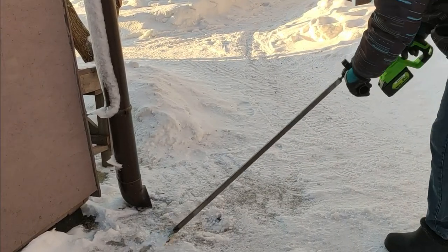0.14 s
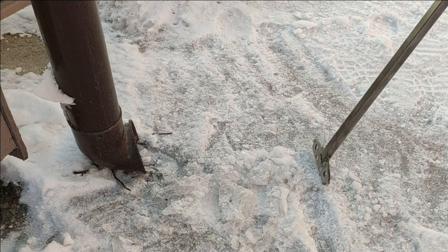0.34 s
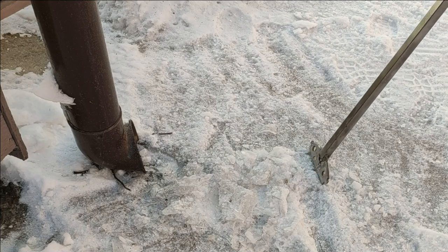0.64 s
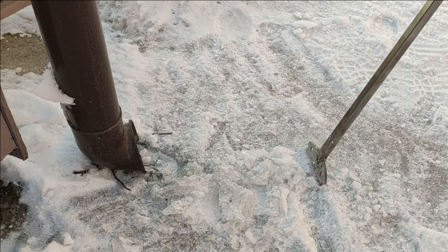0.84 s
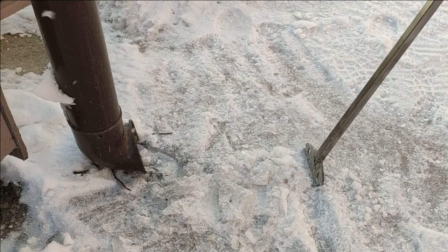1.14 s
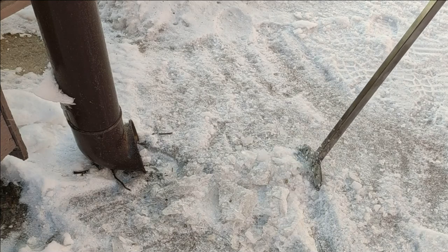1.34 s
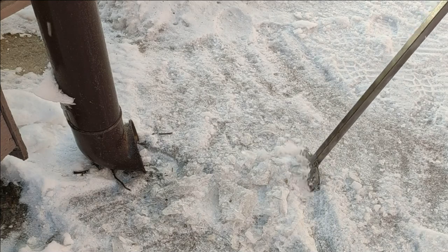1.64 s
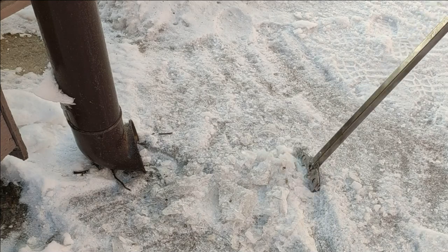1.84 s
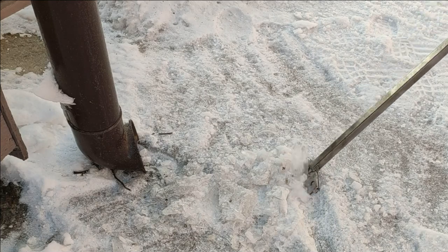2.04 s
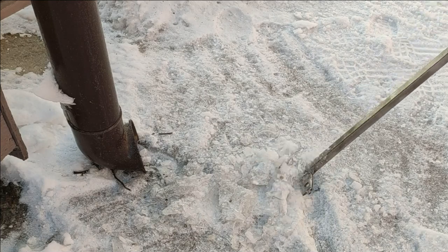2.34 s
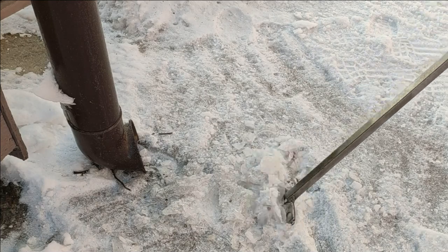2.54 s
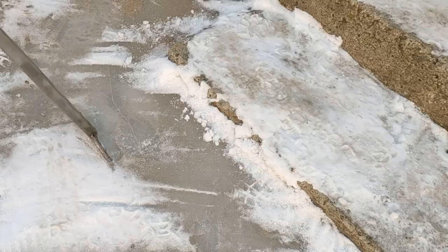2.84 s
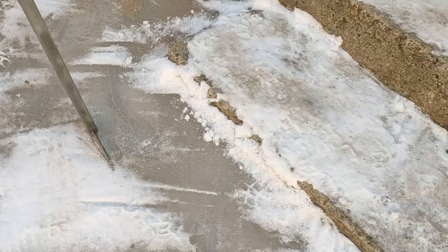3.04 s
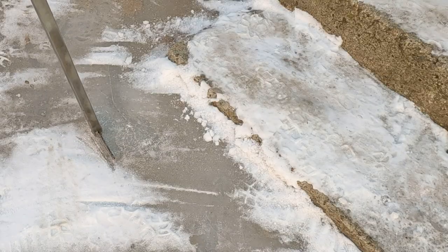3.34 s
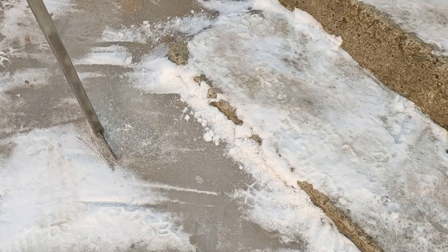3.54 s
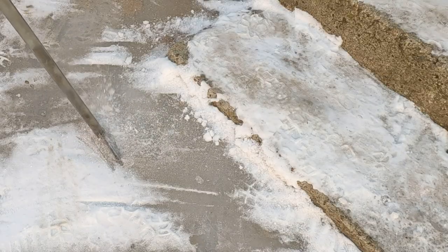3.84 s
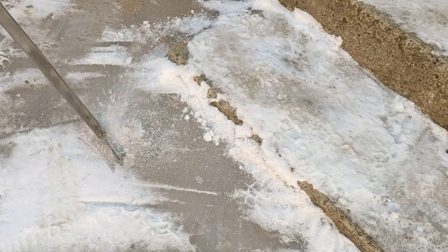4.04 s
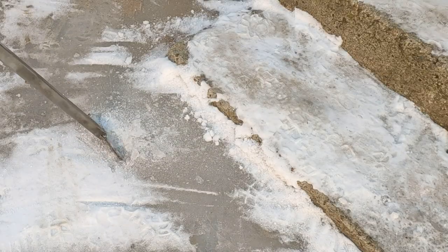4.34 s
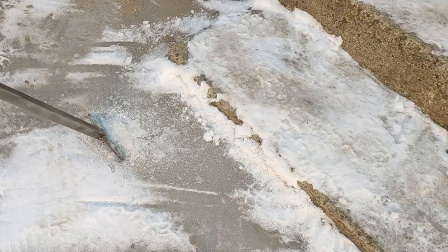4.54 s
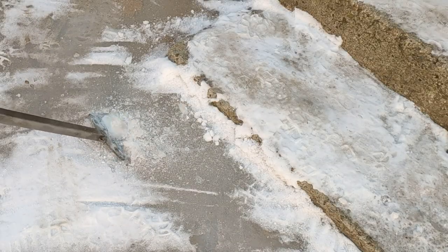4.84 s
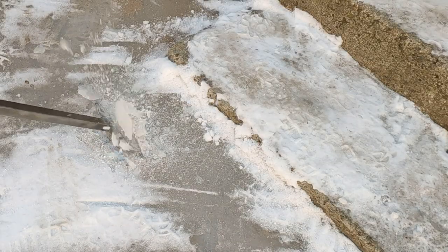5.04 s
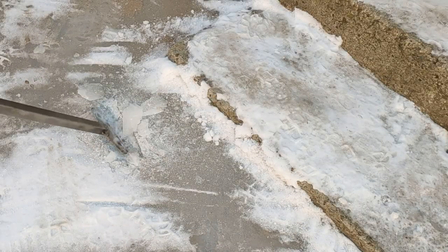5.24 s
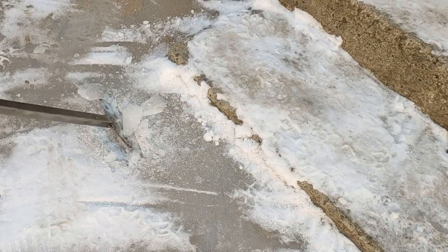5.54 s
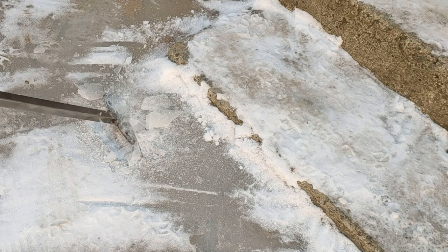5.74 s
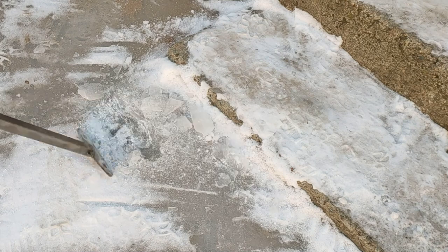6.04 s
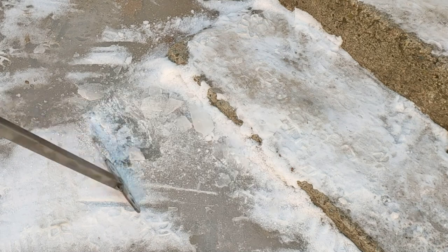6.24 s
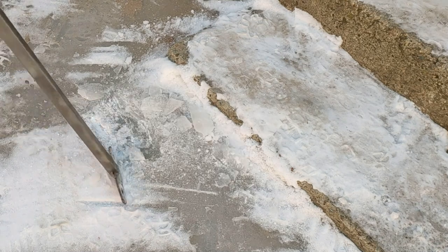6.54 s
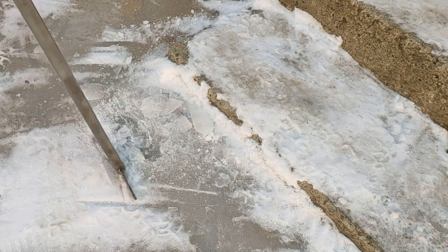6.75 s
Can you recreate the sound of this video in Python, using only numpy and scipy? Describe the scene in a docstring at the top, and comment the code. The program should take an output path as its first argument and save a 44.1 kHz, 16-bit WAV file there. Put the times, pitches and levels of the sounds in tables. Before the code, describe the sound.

Bright gritty ice scraping from a motorized steel rod, buzzing steadily with ringing and thin whine, cut by a tiny gap, then blade clicks and another push.

```python
"""A gust bumps the two-port microphone as a battery tool shoves a steel rod and blade through a coarse ice crust.
From a quarter second on, about 181 blows a second crush puffs of ice grains and ring the rod, amid squeals.
The motor hums and bogs down near 1.1 and 2.2 s; a thin whine comes in spells; chunks crack loose from 2 s onward.
Everything drops out briefly near 2.8 s, then a second long push grinds on until 6.2 s.
The blade ticks on the paving as it lifts and lands, and a last short push ends the scene over outdoor rumble."""
import sys
import numpy as np
from scipy import signal
from scipy.fft import rfft, irfft
from scipy.io import wavfile
from scipy.ndimage import uniform_filter1d, map_coordinates

SR = 44100
rng = np.random.default_rng(int(sys.argv[2]) if len(sys.argv) > 2 else 0)


def dump_mix(stems):
    """Bounce the given channels to the path in sys.argv[1] as a 16-bit WAV at rate SR."""
    frames = np.atleast_2d(stems).T  # one column per channel
    limited = np.clip(frames, -1, 1)  # hard clip at full scale
    pcm = np.round(limited * 32767).astype(np.int16)
    wavfile.write(sys.argv[1], SR, pcm)


N = 304290
TIME = np.arange(N) / SR  # seconds
FREQ = np.maximum(np.arange(N // 2 + 1) * SR / N, 1)  # Hz
FULL_HZ = 181.1  # blows per second at full speed
TOP_HZ = 15850  # upper edge of the sound


# how hard the blade cuts, reference level of the fine ice: [start_s, level_db]
CUT = [(0.32, -39.5), (0.48, -41.5), (0.7, -40.5), (1.0, -41.5), (1.12, -44), (1.22, -42), (1.45, -40.5),
       (1.75, -40), (1.97, -41.5), (2.11, -40), (2.28, -42.5), (2.52, -42.5), (2.68, -41), (2.93, -40),
       (3.25, -40), (3.69, -40), (3.9, -40.5), (4.1, -40), (4.35, -40.5), (4.52, -40), (4.65, -40.8),
       (4.93, -39.3), (5.17, -41.5), (5.5, -41.2), (5.7, -40.5), (5.92, -40.2), (6.05, -40.5), (6.15, -41),
       (6.48, -40.2), (6.6, -39.5), (6.7, -41), (6.86, -40.5)]
# level of the low crunch over time, before its trim: [start_s, level_db]
CRUNCH_LEVEL = [(0.28, -69.5), (0.36, -72), (0.84, -65.5), (1.1, -75), (1.35, -69), (1.68, -66.5),
                (1.92, -70.5), (2.03, -65.5), (2.4, -67), (2.65, -72.5), (2.76, -67.5), (2.93, -72.5),
                (3.12, -72), (3.23, -67.5), (3.33, -70), (3.45, -66), (3.56, -71), (3.69, -69), (3.9, -74),
                (4.1, -65), (4.22, -61.5), (4.34, -61.5), (4.45, -63), (4.62, -71), (4.8, -67), (5.05, -74),
                (5.15, -82), (5.36, -73), (5.48, -79), (5.68, -69), (5.79, -83.5), (5.87, -67),
                (6.05, -67.5), (6.15, -73), (6.48, -70), (6.86, -76)]
# finest sizzling powder, relative to the cut and before its trim: [start_s, level_db]
POWDER = [(.3, -1.5), (.8, -2.5), (1.12, -0.5), (1.37, -6), (1.43, 0), (1.53, -3), (1.8, -5), (2.0, -3),
          (2.09, 1), (2.19, -1), (2.4, -.5), (2.95, 0), (3.25, 1.5), (3.55, -4), (3.68, 2), (3.83, -3),
          (4.0, -2.5), (4.12, 1), (4.3, 2.5), (4.47, 3), (4.6, -0.5), (4.85, -.5), (5.0, 1), (5.2, -1.5),
          (5.55, -.5), (5.95, 1.5), (6.15, 1), (6.6, -1), (6.86, 0)]
# rasp of the larger grains, relative to the cut: [start_s, level_db]
CHIPS = [(.3, -12), (.9, -13.5), (1.4, -14), (1.68, -12), (2.1, -12), (2.65, -10.5), (2.95, -13),
         (3.9, -12), (4.37, -7.5), (4.7, -10.5), (5.3, -11.5), (5.6, -12), (6.15, -10), (6.8, -9.5)]
# spectra of the four grain sizes, relative levels: [pitch_hz, level_db]
SPRAY_SPECTRUM = [(300, -23), (550, -18.5), (900, -14.5), (1500, -10.5), (2500, -6.5), (3700, -1.5),
                  (4500, 1), (5400, 0.5), (7000, 0.5), (8200, 1), (10500, 0), (13000, -0.5), (16000, -12.5)]
SIZZLE_SPECTRUM = [(6000, -26), (10000, 1.5), (12000, 7.5), (14000, 11), (15500, 12), (17000, -25)]
RASP_SPECTRUM = [(500, -17.5), (1400, -9), (2300, -2), (3100, 3), (3900, -7.5), (6000, -16)]
CRUNCH_SPECTRUM = [(50, 1), (130, 0), (300, 0), (600, 0.5), (1100, -3.5), (2000, -6.5), (5000, -37)]
SPRAY_TRIM_DB, SIZZLE_TRIM_DB, CRUNCH_TRIM_DB = 1.41, -2, 5.5
CRUST_DB, CRUST_END_S = -44.5, 0.2  # the opening shove goes through a coarse crust


def ice(flow):
    """Crushed ice: fractures of every size, from coarse crumbs and gritty chips to sizzling powder."""
    cut_db, = curves(CUT)
    crunch_level_db, = curves(CRUNCH_LEVEL)
    powder_db, = curves(POWDER)
    chips_db, = curves(CHIPS)

    fine = treble_swells(grains(flow, scatter_db=0.63), depth_db=1.21, rate=11, count=32)
    spray = colour(ripple(fine), SPRAY_SPECTRUM) * undb(SPRAY_TRIM_DB)

    finest = treble_swells(grains(flow, scatter_db=2.5), depth_db=3.0, rate=14, count=24)
    sizzle = colour(finest, SIZZLE_SPECTRUM) * undb(SIZZLE_TRIM_DB + powder_db)

    # larger chips follow the blows less sharply
    chips = grains(np.sqrt(flow), scatter_db=1.7, count=30)
    rasp = colour(chips, RASP_SPECTRUM) * undb(chips_db)

    coarse = grains(flow, scatter_db=2.0, count=60)
    crust = resonate(coarse, [(880, 3700, 0)]) * undb(CRUST_DB) * (TIME < CRUST_END_S)
    crunch_db = crunch_level_db + CRUNCH_TRIM_DB + 2.3 * walk(12)
    crunch = colour(coarse, CRUNCH_SPECTRUM) * undb(crunch_db)
    return (spray + sizzle + rasp) * undb(cut_db) + crust + crunch


# resonances of the rod, relative levels: [pitch_hz, width_hz, level_db]
ROD_MODES = [(1641, 48, -3), (1718, 57, -1.5), (1797, 61, -1), (1965, 65, -3.5)]
# how freely the rod rings: [start_s, grinding_db, tenth_harmonic_db, eleventh_harmonic_db]
RING = [(.28, -61, -56, -56), (.38, -59, -66, -57), (.55, -62, -69, -66), (.75, -62, -57.5, -60),
        (1.0, -65, -81, -64), (1.1, -73, -73, -68), (1.21, -60, -68, -57), (1.34, -59, -62, -72),
        (1.52, -63, -58, -68), (1.67, -56, -53, -57), (1.9, -62, -57, -65), (2.0, -68, -67, -69),
        (2.5, -77, -75, -66), (2.62, -82, -75, -60), (2.72, -61, -62, -52.5), (2.8, -55.5, -71, -74),
        (2.95, -59.5, -70, -56), (3.12, -60, -64, -63), (3.32, -60, -65, -72), (3.45, -56, -68, -65),
        (3.6, -54, -65, -60), (3.68, -56, -56, -61), (3.95, -58, -67, -67), (4.12, -56.5, -60.5, -67),
        (4.65, -56.5, -59, -64), (4.92, -53.5, -59, -66), (5.12, -57, -55, -58), (5.31, -52.5, -49, -64),
        (5.45, -58, -57.5, -66), (5.65, -56.5, -58, -60), (5.75, -53.5, -60, -65), (5.92, -54.5, -62, -66),
        (6.15, -53.5, -69, -71), (6.48, -57.5, -65, -61), (6.67, -54.5, -53, -58.5),
        (6.86, -57, -67.5, -64)]
# spells in which the rod also sings on the 15th harmonic: [start_s, end_s, level_db]
OVERTONES = [(.72, 1.04, -60), (1.54, 2.2, -55), (5.05, 5.38, -53)]
FLUTTER_DB, FLUTTER_PER_S = 0.5, 18  # uneven ringing as the blade catches and slips


def rod(turns, flow):
    """Grinding rings the rod broadly; harmonics of the blows that meet its resonances sing as clear tones."""
    grind_db, tenth_db, eleventh_db = curves(RING)
    grinding = resonate(grains(flow, scatter_db=-3.5), ROD_MODES) * undb(grind_db)
    singing = sum(tones(turns, [(multiple, 0)], waver_db=0.5, stray=0.3) * undb(db)
                  for multiple, db in [(10, tenth_db), (11, eleventh_db)])
    overtone = tones(turns, [(15, 0)], waver_db=3.0, stray=0.23) * spells(OVERTONES)
    return (grinding + singing + overtone) * undb(FLUTTER_DB * walk(FLUTTER_PER_S))


# the blade catches and the rod flares: [middle_s, length_s, pitch_hz, level_db]
FLARES = [(3.163, 0.074, 1770, -51), (3.376, 0.055, 1820, -52), (3.445, 0.081, 1805, -46.5),
          (3.528, 0.067, 1798, -48.5), (3.587, 0.065, 1805, -48), (3.655, 0.057, 1810, -53.5),
          (3.603, .06, 1720, -50), (3.794, 0.059, 1630, -53), (5.18, 0.055, 1810, -53)]


def flares():
    """The blade catches for a moment and one resonance of the rod flares up."""
    wobble = 0.29 * walk(100)  # radians, shared by all flares
    total = 0
    for middle, length, hz, db in FLARES:
        tone = np.sqrt(2) * np.sin(2 * np.pi * (hz * TIME + rng.random()) + wobble)
        total = total + tone * bump(middle, length) * undb(db)
    return ports(total)


# narrow squeals and broad swells of rasp or hiss; a row that ends before it starts is silent:
# [start_s, end_s, pitch_hz, width_hz, level_db]
SQUEALS = [(-.05, 0.175, 10340, 140, -42), (-.05, .26, 12800, 54, -46), (.35, 1.65, 3440, 330, -56.5),
           (.25, 1.1, 4100, 420, -55.5), (.25, 1.1, 14600, 1500, -53), (1.253, 2.75, 15100, 600, -47),
           (1.25, 2.802, 8840, 220, -52), (1.29, 2.75, 4560, 200, -55), (1.455, 2.01, 3000, 1500, -53.5),
           (1.55, 1.94, 2280, 500, -54), (1.998, 2.2, 1050, 800, -59), (2.03, 2.6, 6400, 200, -54),
           (3.5, 3.28, 11000, 400, -45), (3.455, 3.8, 12300, 870, -45), (3.973, 4.52, 900, 1600, -58),
           (4.07, 4.52, 11850, 220, -48), (5.0, 6.25, 4720, 220, -54.5)]


def squeals(flow):
    """Squeals and broad swells of friction noise, often overlapping, each band-passed from the same grains."""
    friction = grains(flow, scatter_db=1.0)
    return sum(resonate(friction, [(hz, width, 0)]) * swell(start, end) * undb(db)
               for start, end, hz, width, db in SQUEALS)


# lines of the tool's buzz, relative levels: [multiple_of_blow_rate, level_db]
BUZZ_LINES = [(.4, -11.5), (.6, -15), (1, -10), (3.43, -11), (4, -10), (5, -13.5), (8, -7.5), (9, -4.5),
              (12, -2), (13, -17), (14, -4.5), (15, 1), (16, -11), (17, 0.5), (18, -24)]
# levels of the hum at full speed: [start_s, third_harmonic_db, sixth_harmonic_db, seventh_harmonic_db, buzz_db]
HUM = [(.28, -64, -68, -70, -56), (.42, -62, -64, -70, -56), (.56, -64, -68, -68, -58),
       (.72, -59, -69, -66, -55.5), (.83, -59, -73, -78, -59.5), (.99, -58.5, -69, -66, -58.5),
       (1.08, -68.5, -84, -78, -56), (1.3, -65.5, -72, -68, -57.5), (1.6, -67, -62.5, -68, -58.5),
       (1.8, -71, -73, -79, -55.5), (1.95, -65.5, -64.5, -69.5, -62), (2.13, -61, -73, -57, -63),
       (2.19, -63.5, -80, -69, -61), (2.45, -66.5, -79, -71, -56), (2.76, -64.5, -76, -68, -56.5),
       (2.93, -79, -72, -75, -57.5), (3.2, -73, -71, -72, -57), (3.37, -66, -71, -70, -57),
       (3.55, -71, -74, -69, -55), (3.95, -67.5, -71, -64.5, -56), (4.2, -70, -70, -73, -58.5),
       (4.95, -67.5, -68.5, -73, -57), (5.22, -66, -73, -60.5, -54.5), (5.55, -74, -65.5, -73, -55.5),
       (5.72, -64, -70.5, -70, -58), (5.9, -70.5, -70, -69, -56.5), (6.12, -67, -70, -66, -58.5),
       (6.48, -73, -72, -70, -60), (6.86, -71.5, -66, -74, -61)]
BUZZ_POWER = 5.5  # how steeply the buzz amplitude falls with motor speed
ROUGH_DB, ROUGH_PER_S = 1.5, 120  # no two blows are equally hard


def motor(turns, speed):
    """Buzz of the mechanism and drone of the housing, as lines locked to the blows."""
    third_db, sixth_db, seventh_db, buzz_db = curves(HUM)
    # the mechanism hammers much more softly when the motor bogs down
    buzz = tones(turns, BUZZ_LINES, waver_db=1.8, stray=0.24) * undb(buzz_db) * speed ** BUZZ_POWER
    drone = sum(tones(turns, [(multiple, 0)], waver_db=1.3, stray=0.19) * undb(db)
                for multiple, db in [(3, third_db), (6, sixth_db), (7, seventh_db)])
    return (buzz + drone) * undb(ROUGH_DB * walk(ROUGH_PER_S))


# spells of a thin steady whine: [start_s, end_s, level_db]
WHINES = [(.2, 1.04, -51.5), (1.22, 2.2, -54.5), (3.95, 4.853, -50)]
WHINE_HZ, WHINE_WIDTH_HZ = 9936, 24


def whine():
    """A thin steady whine near 9.9 kHz that comes in spells, made of noise through one narrow resonance."""
    return resonate(hiss(), [(WHINE_HZ, WHINE_WIDTH_HZ, 0)]) * spells(WHINES)


# the motor bogs down under load: [start_s, blow_rate_lost_hz]
SAG = [(.99, 0), (1.06, 20.5), (1.13, 25), (1.2, 8), (1.26, 0), (2.14, 0), (2.21, 19), (2.27, 24),
       (2.48, 23), (2.6, 15), (2.7, 11), (2.78, 3), (2.84, 0), (6.25, 0), (6.38, 10), (6.46, 3), (6.53, 0),
       (6.83, 0.5), (6.9, 12.5)]


def blow_rate():
    """Load on the motor pulls the blow rate below full speed; gives blows per second."""
    lost_hz, = curves(SAG)
    return FULL_HZ - lost_hz


PUFF_SIZE = 0.62  # extra flow at each blow, relative to the steady grinding
PUFF_RISE_CYCLES, PUFF_FALL_CYCLES = 0.035, 0.075


def grain_flow(turns):
    """Each blow throws a short puff of grains on top of the steady grinding."""
    falling = np.exp(-(turns % 1) / PUFF_FALL_CYCLES)
    rising = np.exp(-(-turns % 1) / PUFF_RISE_CYCLES)
    return (1 + PUFF_SIZE * np.maximum(falling, rising)) * undb(0.36 * walk(70))


# pushes of the blade into the ice: [start_s, end_s, attack_s, first_touch_db, held_db]
PUSHES = [(-.02, 0.057, .01, 0, 3.5), (.15, 0.26, 0.12, -29.5, -27), (.244, 2.829, 0.0064, -11, 0),
          (2.815, 6.168, 0.11, -7.5, 0), (6.344, 6.907, 0.1, -19.5, 0)]
RELEASE_DB_PER_S = 354


def pushes():
    """Each push swells from a touch, holds and dies away steadily; gives the pressure on the ice."""
    press = 0
    for start, end, attack, touch_db, held_db in PUSHES:
        attack_db = np.interp(TIME - start, [0, attack], [touch_db, held_db])
        release_db = RELEASE_DB_PER_S * np.maximum(TIME - end, 0)
        press = np.maximum(press, undb(attack_db - release_db) * (TIME >= start))
    return press


# the bare blade touches the paving as it lifts and lands, before the fade: [start_s, level_db]
TICKS = [(0.213, -52), (6.214, -37.5), (6.33, -56.5), (6.344, -42.5)]
TICK_DECAY_S = 0.0037


def ticks():
    """Short bright clicks of steel on stone."""
    click = colour(hiss(), [(500, -8), (2000, -8), (6000, 5), (15000, 3.0)])
    return click * hits(TICKS, TICK_DECAY_S)


# chunks breaking off, before the fade: [start_s, level_db]
KNOCKS = [(2.049, -56), (3.143, -36), (3.218, -39), (3.645, -47), (4.029, -43), (4.11, -46), (4.315, -41.5),
          (4.372, -43), (4.464, -42.5), (5.3, -42)]
# dull bumps through the ground, before the fade: [start_s, level_db]
BUMPS = [(1.82, -57), (2.02, -64), (2.18, -56), (3.49, -66), (3.68, -61), (4.11, -59.5)]
KNOCK_DECAY_S, BUMP_DECAY_S = 0.013, 0.04


def knocks():
    """Chunks of ice crack off in grainy bursts, and heavier shoves thud through the ground."""
    crack = colour(grains(1, scatter_db=3.5), [(120, 0.0), (500, -4), (1800, -0.5), (4000, -0.5), (12000, -11.0)])
    thud = colour(hiss(), [(30, 1), (55, -9), (130, -15), (400, -24), (2000, -63)])
    return crack * hits(KNOCKS, KNOCK_DECAY_S) + thud * hits(BUMPS, BUMP_DECAY_S)


# spectrum of the outdoor rumble, relative levels: [pitch_hz, level_db]
YARD_SPECTRUM = [(15, 3.5), (40, -9.5), (72, 4), (120, -5), (200, -9.5), (400, -30.5), (1500, -31.5),
                 (16000, -48)]
# gust and thump levels come before the port gains and the bass cut
GUST_DB, GUST_HOLD_S, GUST_FALL_DB_PER_S = -40, 0.02, 283
THUMP_DB, THUMP_PEAK_S, THUMP_LENGTH_S, BASS_CUT_HZ = -27, 0.034, 0.14, 1.85


def air():
    """Steady outdoor rumble, and one gust whose turbulence and pressure mostly buffet the right port."""
    yard = colour(hiss(), YARD_SPECTRUM) * undb(-68.0)
    buffet = colour(rng.standard_normal((2, N)),
                    [(20, -3), (35, -6.0), (70, -13), (130, -9.0), (400, -24), (2000, -64)])
    gust = undb(GUST_DB - GUST_FALL_DB_PER_S * np.maximum(TIME - GUST_HOLD_S, 0))
    # the puff's pressure swings slowly back through the microphone's bass cut
    puff = bump(THUMP_PEAK_S, THUMP_LENGTH_S) * undb(THUMP_DB)
    swing = irfft(rfft(puff) * (FREQ / (FREQ - 1j * BASS_CUT_HZ)) ** 2, N)
    port_gains = undb(np.array([[-13], [1.5]]))  # left, right
    return yard + (buffet * gust + swing) * port_gains


DROPOUT_S, DROPOUT_DB_PER_S = 2.786, 2000.5
RETURN_START_S, RETURN_S = 2.826, 0.0095


def dropout():
    """The whole sound fades out fast and comes straight back."""
    fall = undb(-DROPOUT_DB_PER_S * np.maximum(TIME - DROPOUT_S, 0))
    comeback = np.clip((TIME - RETURN_START_S) / RETURN_S, 0.001, 1)
    return np.maximum(fall, comeback)


# share of the sound that arrives directly: [pitch_hz, power_share_0_to_1]
DIRECT_SHARE = [(100, 0.6), (300, 0.03), (600, 0.26), (1200, 0.49), (1900, 0.25), (3000, 0.52), (6000, 0.3),
                (15000, 0.14)]


def grains(flow, scatter_db, count=10):
    """Dense tiny fractures of uneven size, heard directly and scattered off the ground and walls."""
    # each random size lasts for count samples
    sizes = np.minimum(rng.exponential(size=N // count + 1), 6)
    strength = flow * undb(scatter_db * np.repeat(sizes, count)[:N])
    direct = ports(strength * rng.standard_normal(N))
    scattered = strength * rng.standard_normal((2, N))
    share = np.clip(across(DIRECT_SHARE), 0, 1)
    return irfft(rfft(direct) * np.sqrt(share) + rfft(scattered) * np.sqrt(1 - share), N)


def hiss():
    """Smooth noise from the direction of the tool."""
    return grains(1, 0)


def tones(turns, orders, waver_db, stray):
    """Lines locked to the blows; each wavers as the grip and the reflections change."""
    direct, reflected = 0, 0
    for multiple, db in orders:
        phase = 2 * np.pi * (multiple * turns + rng.random())
        line = undb(db + waver_db * walk(14)) * np.exp(1j * phase)
        direct = direct + line.real
        reflected = reflected + (line * (walk(17.0) + 1j * walk(5.6))).imag
    # reflections reach the two ports in opposite polarity
    return unit(ports(direct) + stray * reflected * np.array([[1], [-1]]))


def treble_swells(x, depth_db, rate, count):
    """Regions of the spectrum, most of them treble, swell and sink at random, each on its own."""
    spectrum = rfft(x)
    centres = np.linspace(0, TOP_HZ, count)
    total = 0
    for row in np.eye(count):
        band = np.interp(FREQ, centres, row)
        total = total + irfft(spectrum * band, N) * undb(depth_db * walk(rate))
    return unit(total)


RIPPLE_DB, RIPPLE_WIDTH_HZ = 1.0, 55


def ripple(x):
    """Small random peaks and dips, fixed in time, roughen the spectrum."""
    gains_db = RIPPLE_DB * rng.standard_normal(size=1000)
    ripple_db = np.interp(FREQ / RIPPLE_WIDTH_HZ, np.arange(len(gains_db)), gains_db)
    return irfft(rfft(x) * undb(ripple_db), N)


# lag of the left microphone port behind the right: [start_s, lag_samples]
PORT_LAG = [(0, 4.64), (2.8, 4.76), (2.83, 5.7), (6.9, 6.3)]


def ports(x):
    """The direct sound reaches the right port first."""
    lag, = curves(PORT_LAG)
    left = map_coordinates(x, [np.arange(N) - lag], order=3, mode="nearest")
    return np.array([left, x])


def colour(x, points):
    """Filter by a spectrum that falls away below its first point, then scale to rms 1."""
    bass_fall = 1 + (points[0][0] / FREQ / 2) ** 2
    return unit(irfft(rfft(x) * undb(across(points)) / bass_fall, N))


def resonate(x, modes):
    """Ring a set of resonances with alternating polarity, then scale to rms 1."""
    response = 0
    for k, (hz, width, db) in enumerate(modes):
        detune = hz / width * (FREQ / hz - hz / FREQ)
        response = response + undb(db) / (1 + 1j * detune) * (-1) ** k
    return unit(irfft(rfft(x) * response, N))


def walk(rate):
    """Random levels held 1 / rate s and slewed; spread 1."""
    size = max(int(SR / rate), 2)
    steps = np.repeat(rng.standard_normal(N // size + 1), size)
    return unit(uniform_filter1d(steps, size)[:N])


def fade(start, decay):
    """A quick rise and an exponential fall."""
    age = np.maximum(TIME - start, 0)
    return (1 - np.exp(-age / (decay / 10))) * np.exp(-age / decay)


def hits(rows, decay):
    """Sum of fades, one per strike in a table."""
    return sum(undb(db) * fade(start, decay) for start, db in rows)


SWELL_S = 0.059  # rise and fall time


def swell(start, end):
    """Rise, hold and fall."""
    return np.clip(np.minimum(TIME - start, end - TIME) / SWELL_S, 0, 1)


def spells(rows):
    """Sum of swells, one per spell in a table."""
    return sum(swell(start, end) * undb(db) for start, end, db in rows)


def bump(middle, length):
    """One smooth raised-cosine hump."""
    return np.cos(np.pi * np.clip((TIME - middle) / length, -0.5, 0.5)) ** 2


def curves(rows):
    """Each column of a table, joined by straight lines in time."""
    s, *columns = np.transpose(rows)
    return [np.interp(TIME, s, column) for column in columns]


def across(points):
    """Points joined on a log-frequency axis."""
    hz, value = np.transpose(points)
    return np.interp(np.log(FREQ), np.log(hz), value)


def undb(db):
    """Decibels to gain."""
    return 10 ** (np.asarray(db) / 20)


def unit(x):
    """Scale to rms 1."""
    return x / np.sqrt(np.mean(x ** 2))


def scene():
    """The blow rate times the tool; the pressure on the ice sets its level."""
    blow_hz = blow_rate()
    turns = np.cumsum(blow_hz * (1 + 0.001513 * walk(30))) / SR  # blows so far, slightly unsteady
    flow = grain_flow(turns)
    steel = rod(turns, flow) + flares() + squeals(flow)
    tool = ice(flow) + steel + motor(turns, blow_hz / FULL_HZ) + whine()
    return (tool * pushes() + ticks() + knocks() + air()) * dropout()


def record(dry):
    """The recorder cuts the top steeply."""
    lowpass = signal.ellip(12, 0.1, 80, TOP_HZ, fs=SR, output="sos")
    return signal.sosfilt(lowpass, dry)


dry = scene()
out = record(dry)
dump_mix(out)
```